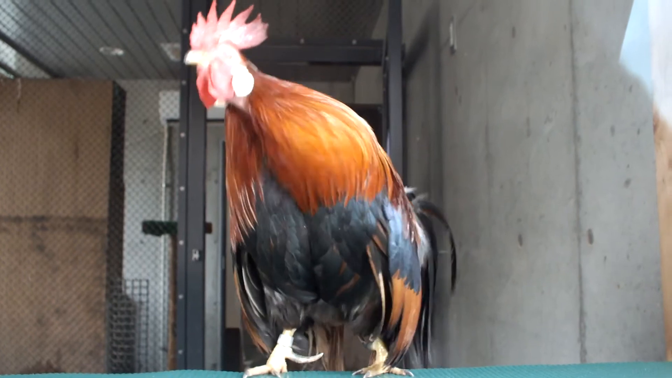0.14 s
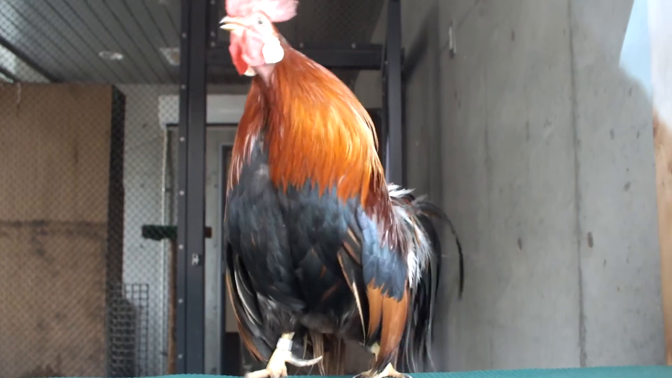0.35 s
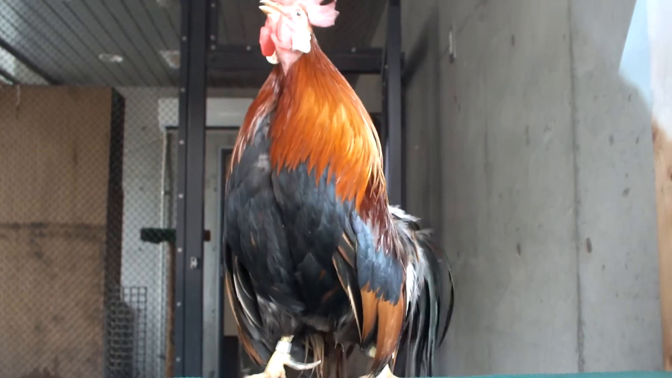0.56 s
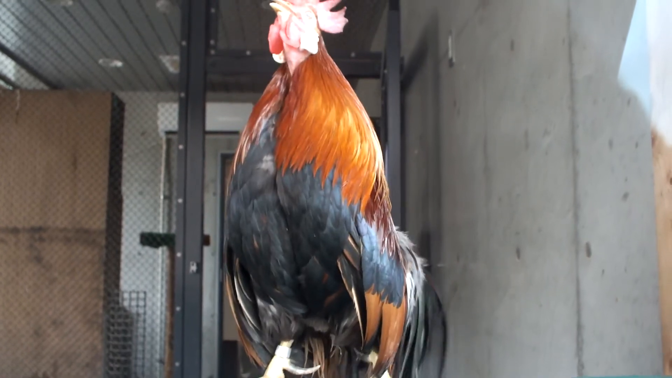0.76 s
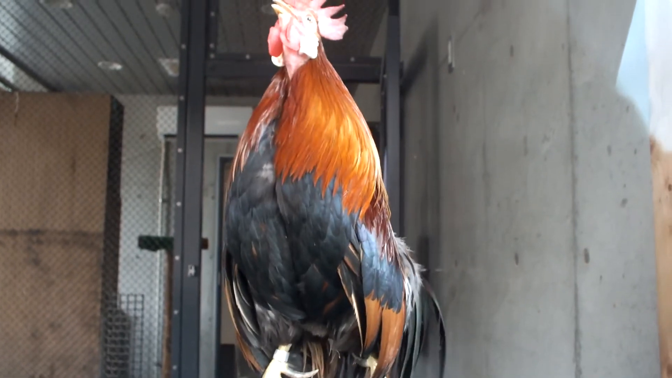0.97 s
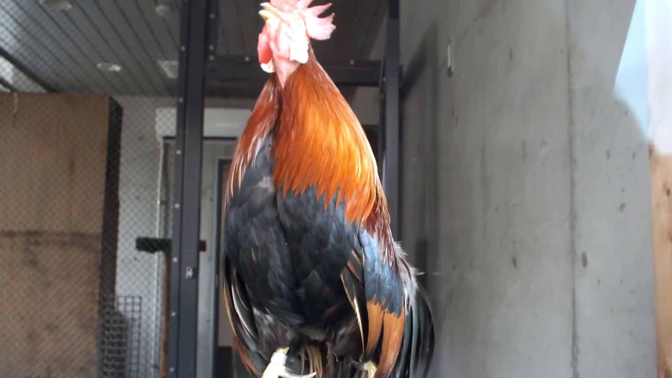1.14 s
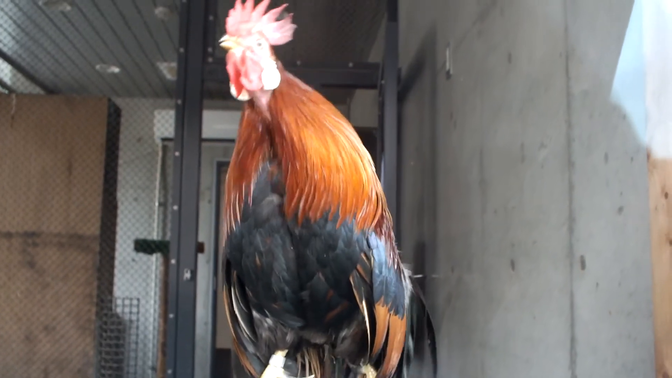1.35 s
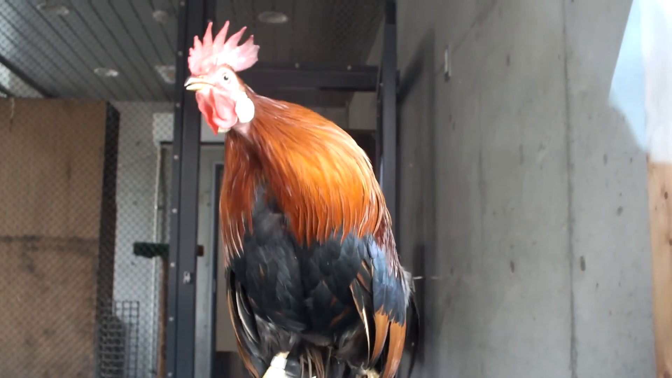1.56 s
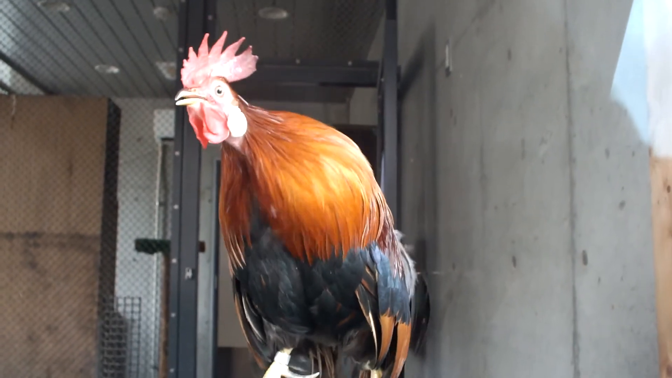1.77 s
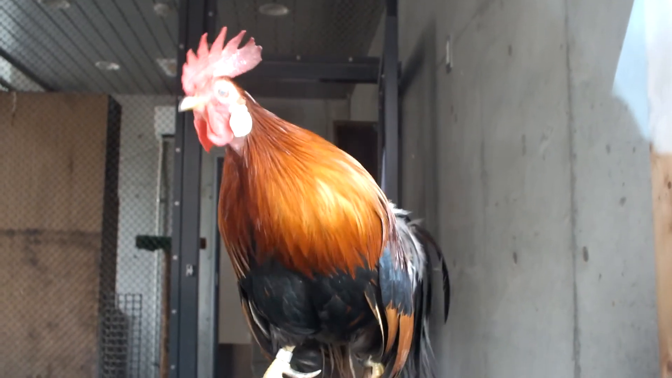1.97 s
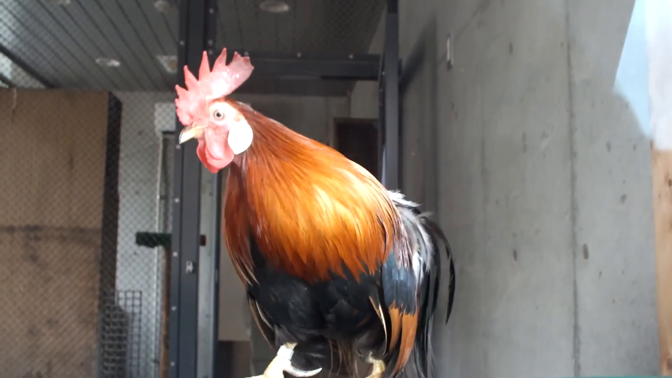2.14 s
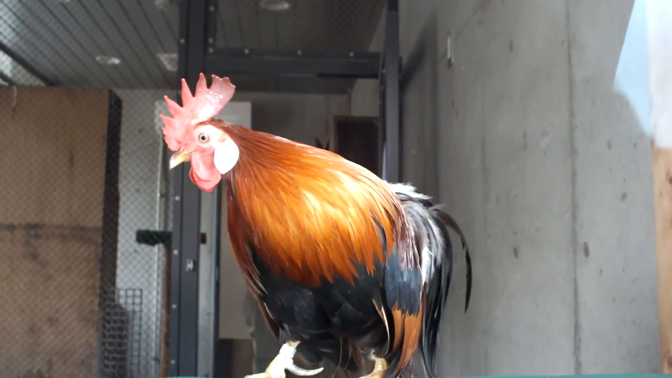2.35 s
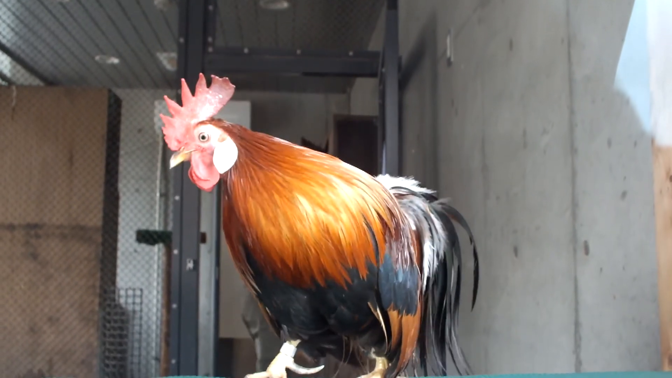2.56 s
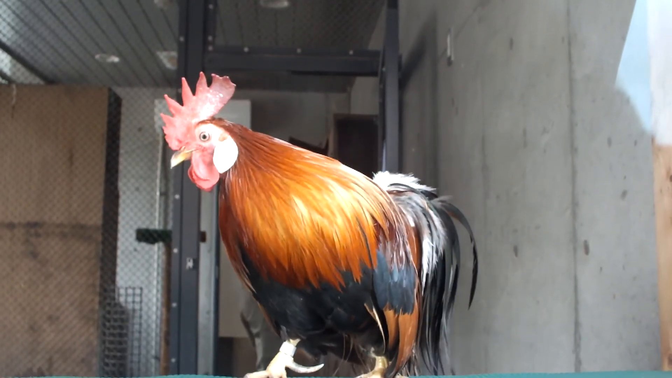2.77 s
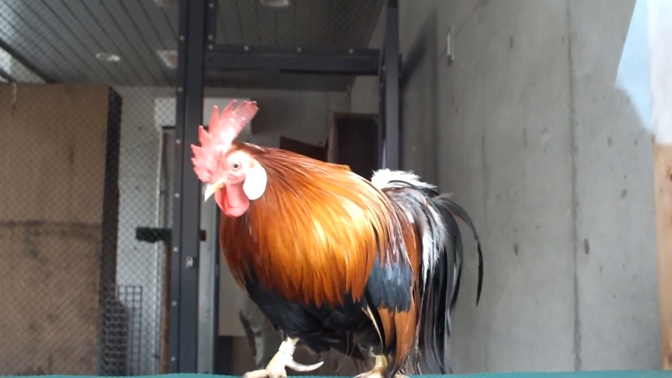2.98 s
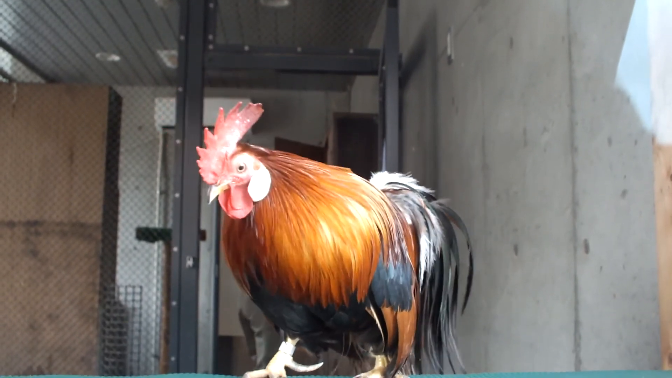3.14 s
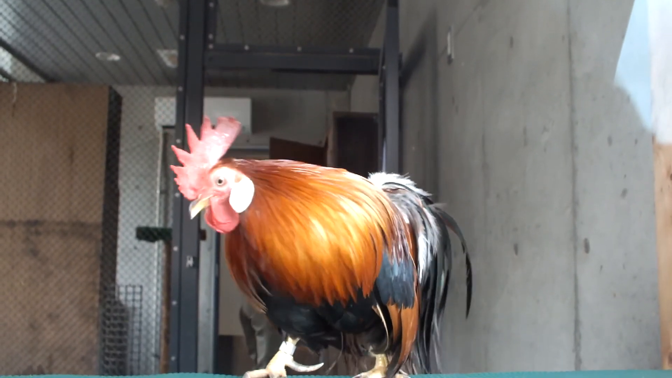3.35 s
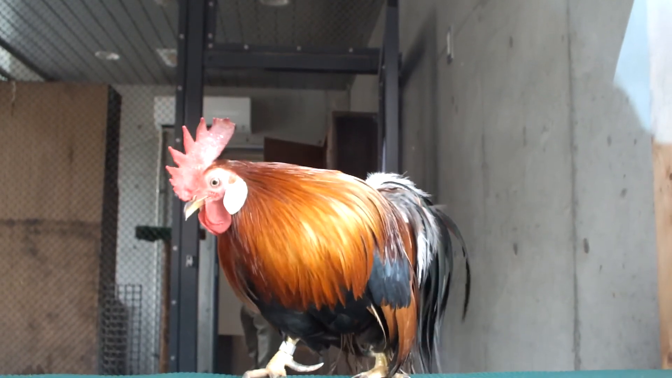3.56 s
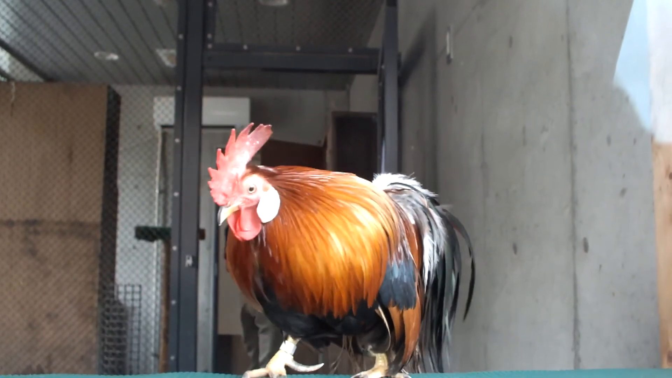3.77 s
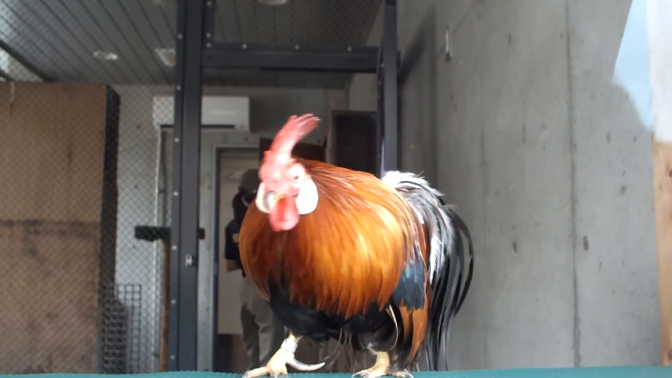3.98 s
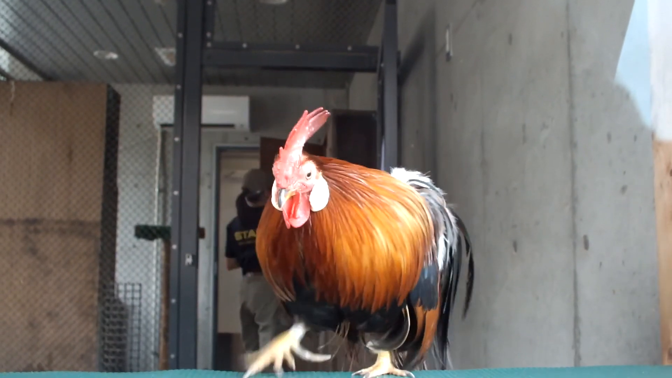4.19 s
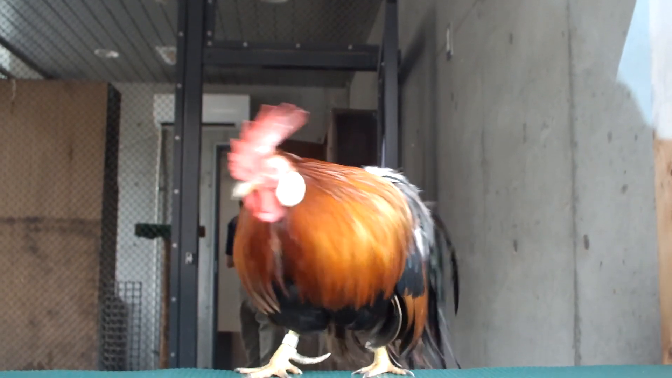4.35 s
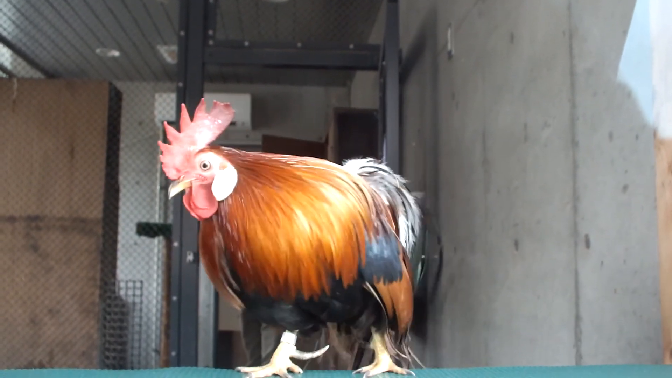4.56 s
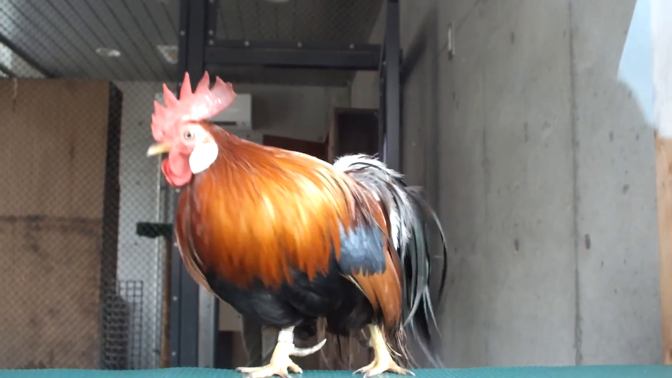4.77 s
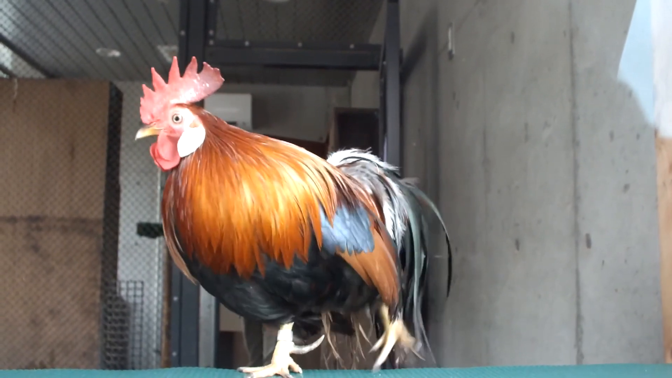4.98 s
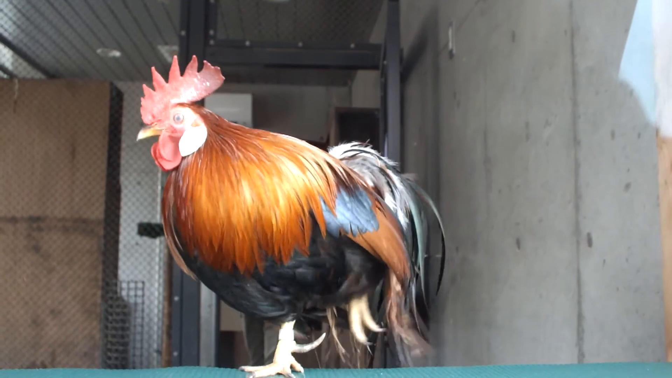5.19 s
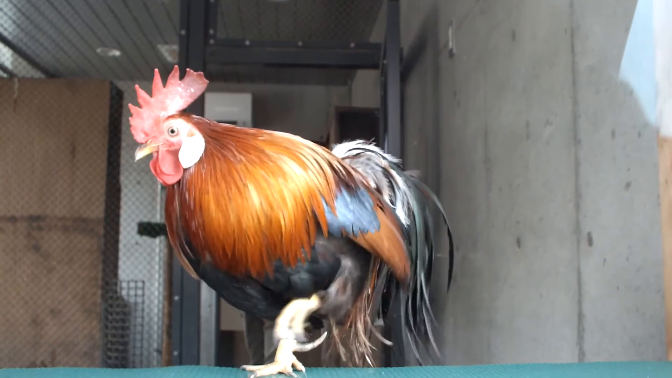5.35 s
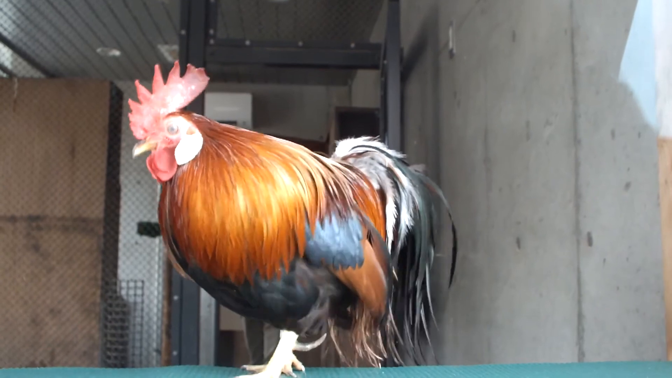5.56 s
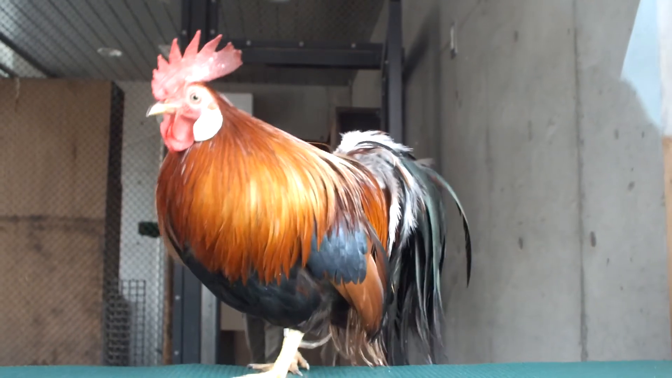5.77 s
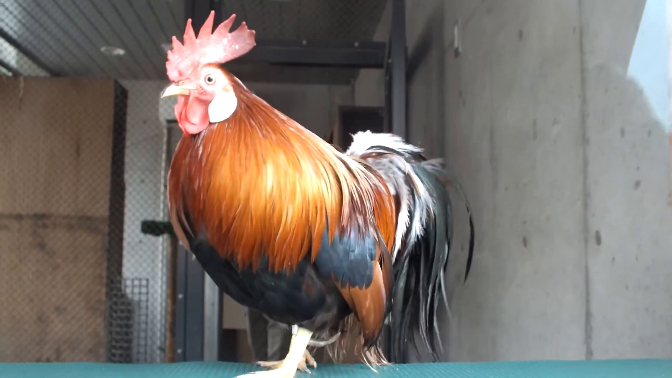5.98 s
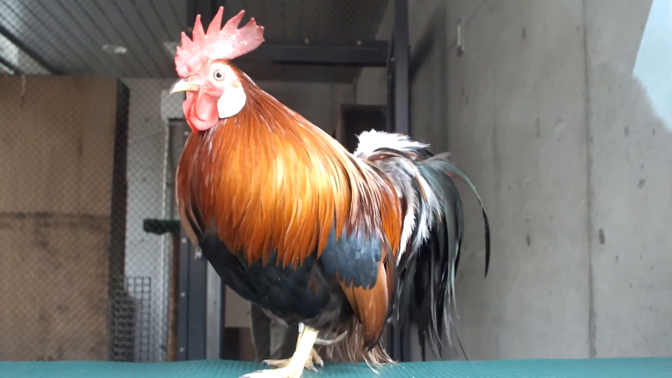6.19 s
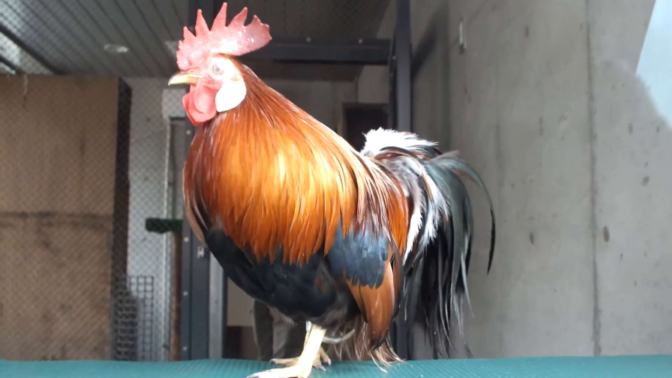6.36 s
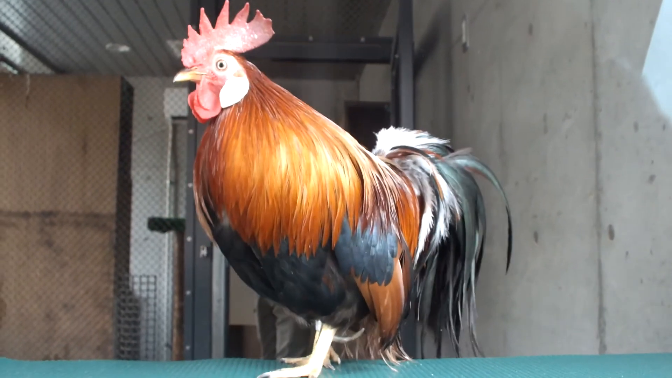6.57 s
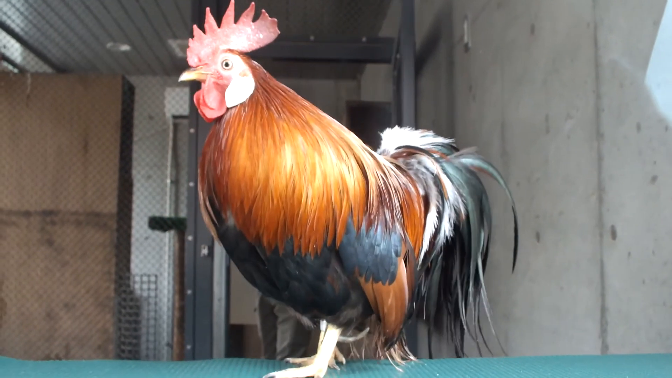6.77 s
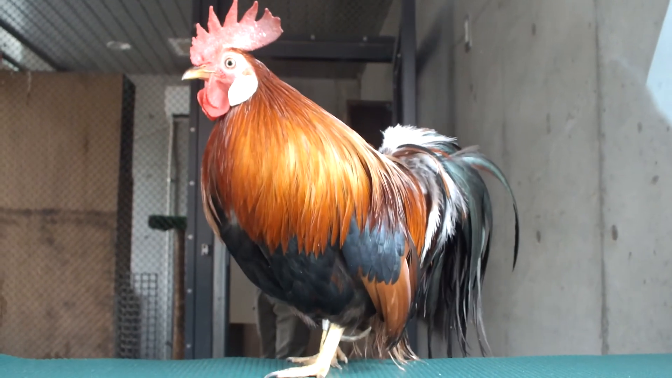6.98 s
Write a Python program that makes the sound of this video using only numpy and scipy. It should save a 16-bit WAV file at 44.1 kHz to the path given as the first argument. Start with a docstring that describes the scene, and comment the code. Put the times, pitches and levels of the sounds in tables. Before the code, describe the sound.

Close to the microphone, a rooster gives a short cluck, then a loud, hoarse, broken crow ending in a long clear note that slides down. A second bird crows more faintly behind it. Concrete walls give a brief diffuse echo. Afterwards only traffic rumble and a motor drone remain, with soft foot knocks and a far bird starting at the very end.

```python
"""Traffic rumbles and a motor drones outside, as filtered noise and a harmonic series, from start to end.
Almost at once a rooster on a table in a concrete shed crows: syrinx overtones, clear or hoarse, with rasp and pips.
A second bird joins in behind it; thin squeaks follow, and the walls answer with diffuse, decaying echoes.
Later, feet knock and scuff on the table; at the very end a far bird starts."""
import sys
import numpy as np
from scipy import signal
from scipy.fft import rfft, irfft
from scipy.io import wavfile
from scipy.ndimage import uniform_filter1d

SR = 44100
rng = np.random.default_rng(int(sys.argv[2]) if len(sys.argv) > 2 else 0)


def unload_wav(signal):
    """Save mono or channel-first audio to the path in sys.argv[1] as 16-bit WAV at rate SR, clipped to [-1, 1]."""
    wavfile.write(
        sys.argv[1],
        SR,
        np.round(np.clip(np.atleast_2d(signal).T, -1, 1) * 32767).astype(np.int16),
    )


N = 310023


def from_db(db):
    """Logarithmic level: 20 dB is a factor of ten in amplitude."""
    return 10 ** (np.asarray(db) / 20)


def rms_one(x):
    """Normalisation: scale to unit effective value."""
    return x / np.sqrt(np.mean(x ** 2) + 1e-20)


def in_time(rows):
    """Linear interpolation: the columns of a t/s table at every sample."""
    s, *columns = np.transpose(rows)
    return [np.interp(np.arange(N) / SR, s, c) for c in columns]


def at_hz(points, hz):
    """Logarithmic pitch axis: read a spectrum by equal frequency ratios."""
    log_table_hz = np.log(np.array(points)[:, 0])
    return np.interp(np.log(np.maximum(hz, 1)), log_table_hz, np.array(points)[:, 1])


def drift(rate_hz, size=N):
    """Random fluctuation: noise through a two-pole low-pass, unit rms."""
    settle = SR // 4
    r = np.exp(-2 * np.pi * rate_hz / SR)
    noise = rng.standard_normal(size + settle)
    return rms_one(signal.lfilter([1], [1, -2 * r, r * r], noise)[settle:])


def colour(x, spectrum):
    """Linear filtering: weight each frequency by the spectrum, then set rms to 1."""
    hz = np.arange(N // 2 + 1) * SR / N
    return rms_one(irfft(rfft(x) * from_db(at_hz(spectrum, hz)), N))


def bump(s, length_s):
    """Gaussian envelope: length_s is the full width at 1/e of the peak."""
    return np.exp(-(2 * (np.arange(N) / SR - s) / length_s) ** 2)


# likeness of left and right in a diffuse field: (f/Hz, correlation 0-1)
LIKENESS = [(60, 1), (180, 0.98), (500, 0.88), (1500, 0.14), (4300, 0.36), (12700, 0.27)]


def wide_noise(spectrum):
    """Partial coherence: mid and side noise mixed so that left-right likeness depends on frequency."""
    hz = np.arange(N // 2 + 1) * SR / N
    alike = np.clip(at_hz(LIKENESS, hz), 0, 1)
    mid, side = rfft(rng.standard_normal((2, N)))
    side = side * np.sqrt((1 - alike) / (1 + alike))
    pair = np.sqrt(1 + alike) * np.array([mid + side, mid - side])
    return colour(irfft(pair, N), spectrum)


DEEP_DB, FIRING_HZ = -45.5, 59.85   # mean level of the deepest rumble; fundamental of the motor
# background as heard, sinking under the crow: (t/s, rumble level/dB, motor level/dB, wash level/dB)
STREET = [(0.0, -41, -47, -43), (.3, -40, -43.5, -43), (0.42, -49.5, -53.5, -52.5), (.9, -45.5, -50.5, -46),
          (1.4, -41, -51.5, -44.5), (2.4, -40.5, -57, -44), (3.0, -39, -51, -39.5),
          (3.3, -39.5, -40.5, -41), (3.7, -38, -43.5, -42), (4.2, -36.5, -52.5, -41),
          (5.1, -38.5, -43, -41.5), (5.4, -39.5, -42.5, -42), (5.9, -39, -40.5, -41), (6.2, -38, -52, -42),
          (6.5, -39.5, -38, -41.5), (7.03, -39.5, -40.5, -41)]
# harmonics of the motor: (multiple of the fundamental, relative level/dB)
MOTOR = [(2, -6), (3, 0), (4, -13.5), (5, -4.5), (6, -6), (7, -17)]
# spectra of the deepest rumble, the rumble and the far wash: (f/Hz, relative level/dB)
DEEP = [(11, -32.5), (18, -11.5), (60, 2), (80, 7.5), (98, -5.5), (140, -33.5), (240, -120)]
RUMBLE = [(59, -22), (100, -6.5), (124, 2), (150, -1), (178, 0), (205, -2), (298, -4), (328, -4.5),
          (526, -9.5), (700, -17.5), (910, -37.5), (1540, -120)]
AIR = [(240, -20.5), (400, -19), (602, -1.5), (907, -4.5), (1180, -5), (1800, -10), (3480, -11),
       (4590, -13), (6820, -18.5), (8120, -26), (13200, -38)]


def street():
    """Superposition of fluctuating noise bands and a harmonic motor drone of wavering frequency."""
    rumble_db, motor_db, wash_db = in_time(STREET)
    deep = from_db(DEEP_DB + 2.0 * drift(2.2)) * wide_noise(DEEP)
    rumble = from_db(rumble_db + 1.0 * drift(22.0)) * wide_noise(RUMBLE)
    phase = 2 * np.pi * np.cumsum(FIRING_HZ + 0.446 * drift(3.58)) / SR
    motor = sum(from_db(motor_db + db + 2.1 * drift(1.6)) * np.sin(k * phase + k * k) for k, db in MOTOR)
    return deep + rumble + motor + from_db(wash_db) * wide_noise(AIR)


# flapping rate of the slack membrane: (t/s, f/Hz)
THROB = [(.5, 97), (.7, 88), (.85, 90), (1.0, 99), (1.2, 107), (1.45, 120), (1.85, 122), (2.0, 135),
         (3.0, 120), (6.9, 100)]


def throb():
    """Integrated frequency: phase of the slack membrane's slow, slightly uneven flapping."""
    return 2 * np.pi * np.cumsum(in_time(THROB)[0] + 4.0 * drift(10)) / SR


def span(rows, rise_s=.008):
    """Onset and decay: samples of a syllable, with a quick rise and a fall slower for longer notes."""
    a, b = round(rows[0][0] * SR), min(round(rows[-1][0] * SR), N)
    k = np.arange(b - a)
    rise = k / (rise_s * SR)
    fall = k[::-1] / (len(k) / 20) + (b == N)   # no fall where the sound ends in mid-syllable
    return slice(a, b), np.clip(np.minimum(rise, fall), 0, 1)


WAVER_DB, CLEAR_WAVER = 3.5, .4   # unsteadiness of each overtone; its share in a clear voice
SMOOTHED_SHARE = 0.16   # share of the smoothed level in all overtones but the 2nd
GRAIN, GRAIN_HZ = .4, 80   # hoarseness chops each overtone into grains
# low overtones and half lines: multiples of the pitch
MULTIPLES = (1, 2, 3, 4, 5, 2.5, 4.5)
# response of the windpipe to the low overtones: (f/Hz, level/dB)
WINDPIPE = [(600, -16.5), (900, -11.5), (1130, -12), (1560, -13), (1860, -4), (2300, -1), (2600, -5),
            (2800, -15.5), (3150, -19.5), (3600, -30.5), (4600, -19.5), (5600, -69.5)]
# lifts of the lowest, third and fourth overtones over their usual balance: (t/s, level/dB)
LOWEST = [(.05, -1.5), (.38, 6), (0.451, -3), (.6, 3), (.74, -2), (.95, 9), (1.45, -4), (1.5, 7.5),
          (1.75, -4), (2.08, -0.5), (2.14, -10), (2.3, 2), (2.44, -2.5), (2.62, 9), (2.72, 4), (3.0, 0),
          (3.15, 1), (6.95, -7), (7.03, 7)]
THIRD = [(.05, 7), (1.6, 9), (2.0, 7), (2.14, -2), (2.281, -5), (2.5, -0.5), (2.7, 5.5), (2.83, 10),
         (2.9, 11.5), (3.0, 10), (3.1, 2.5), (3.2, 0), (6.9, 2), (6.96, -9)]
FOURTH = [(.05, 7.5), (.6, -2.5), (1.0, 6), (1.5, 3), (1.9, -3.5), (2.15, 1.5), (2.5, -3.5), (2.9, -3),
          (3.0, 3), (3.1, 5.5), (3.17, -9), (6.9, 7)]


def low_overtones(part, pitch, phase, tone_db, balance, share, scatter, depth, flap, shake_db=8.0):
    """Source and filter: phase-modulated overtones of the syrinx, weighted by the windpipe."""
    size = len(pitch)
    lifts = {k: in_time(curve)[0][part] for k, curve in zip((1, 3, 4), (LOWEST, THIRD, FOURTH))}
    smoothed_db = uniform_filter1d(tone_db, size=9000, mode="nearest")
    blended_db = tone_db + SMOOTHED_SHARE * (smoothed_db - tone_db)
    out = 0
    for k, db in zip(MULTIPLES, balance):
        shaken_db = scatter * shake_db * drift(24, size)
        shaken_db = shaken_db + WAVER_DB * (CLEAR_WAVER + share / 4) * drift(24.0, size)
        level_db = tone_db if k == 2 else blended_db
        gain = from_db(level_db + db + at_hz(WINDPIPE, k * pitch) + shaken_db + lifts.get(k, 0))
        if k % 1:
            gain = gain * np.sqrt(share)   # half lines need hoarseness
        gain = gain * (1 + GRAIN * share * drift(GRAIN_HZ, size))
        out = out + gain * np.sin(k * phase + depth * np.sin(flap + k))
    return out


SHRILL_FOLLOWS, SHRILL_SPREAD_HZ = 0.13, 220   # share of the tone's swing; smear by hoarseness
# shrill overtones over their row: (t/s, level of all/dB, further level of the 6th and 7th/dB)
BRIGHT = [(.05, 3, 1), (.35, 6, -21), (.45, -3.5, -0.5), (.75, -8, 5), (1.0, -3, 5), (1.3, 0.5, 5.5),
          (2.05, -7, 4), (2.15, -6, -11), (2.3, -3, -9), (2.46, -2.5, -6), (2.53, -0.5, 9), (2.7, 0, 9.5),
          (2.85, -0.5, 6), (3.0, -4.5, -9), (3.15, -20, 1), (6.9, -12, 0), (6.96, -3, -2)]


def shrill_overtones(part, phase, tone_db, shrill, share):
    """Amplitude modulation by noise: hoarseness smears the upper overtones into bands."""
    size = len(phase)
    all_db, edge_db = [c[part] for c in in_time(BRIGHT)]
    all_db = all_db + SHRILL_FOLLOWS * (tone_db - np.median(tone_db))
    out = 0
    for k, db in enumerate(shrill):
        gain = from_db(db + all_db + edge_db * (k < 2) + 2.5 * drift(8.0, size))
        smear = 1 - share + share * drift(SHRILL_SPREAD_HZ, size)
        out = out + gain * smear * np.sin((6 + k) * phase + k * k)
    return out


ROUGH_DB, ROUGH_HZ, HALF_LINES_DB = 1, 30, -7   # clinging rasp: level, fluctuation rate, half lines' level
RATTLE = .75   # how far each flap of the membrane shuts off the rasp, 0-1
# throat resonances that colour the rasp: (f/Hz, relative level/dB)
THROAT = [(600, -41), (780, -54), (860, -10.5), (1080, -8.5), (1350, -10.5), (1700, 1.5), (2200, 4.5),
          (3000, -4), (3400, -11), (3750, -20.5), (4150, -9.5), (4550, -19), (4750, -47.5), (5300, -59),
          (5700, -41), (6400, -49.5), (6900, -28.5), (7900, -36.5), (8500, -54), (9300, -71),
          (10200, -40.5), (11200, -42), (13000, -46)]


def clinging_rasp(pitch, phase, rasp_db, gape, flap):
    """Narrow-band noise: fluctuating lines at the overtones and half way between, shaped by the throat."""
    stretch, treble_db = gape
    out = 0
    for k in np.arange(2, 24) / 2:
        above = np.clip(k * pitch / 500 - 6.5, 0, 1)   # 0 below 3.25 kHz, 1 above 3.75 kHz
        line_db = at_hz(THROAT, k * pitch / stretch) + treble_db * above + HALF_LINES_DB * (k % 1 > 0)
        out = out + from_db(line_db) * (.6 + .8 * drift(ROUGH_HZ, len(pitch))) * np.sin(k * phase + k * k)
    return from_db(rasp_db + ROUGH_DB) * out * (1 + RATTLE * np.cos(flap)) / 2


CLEAR_SCATTER = .06   # pitch scatter of a clear voice, 0-1
# one table a syllable, five of the crow, the second bird, the far bird:
# (t/s, f/Hz, tone level/dB, rasp level/dB)
SYLLABLES = [
    [(.058, 854, -37, -31), (.07, 868, -22, -32), (.09, 869, -14.5, -30.5), (.12, 849, -22, -25.5),
     (.15, 841, -24, -29.5), (.18, 852, -50, -58)],
    [(.322, 1109, -51, -31), (.36, 1131, -22, -21.5), (.41, 1125, -14, -41), (.46, 1122, -21.5, -48),
     (.485, 1133, -28, -24.5), (.55, 1139, -19.5, -23.5), (.595, 1131, -14.5, -29.5),
     (.655, 1136, -22.5, -43), (.665, 1121, -17, -26), (.69, 1131, -27, -27.5), (.72, 1115, -13, -24.5),
     (.74, 1131, -20.5, -25.5), (.78, 1134, -23.5, -25), (.83, 1079, -20.5, -25.5), (1.0, 1065, -36, -29.5),
     (1.1, 1047, -77, -38), (1.17, 1080, -62, -52), (1.33, 1084, -61, -38)],
    [(1.39, 930, -43, -45), (1.42, 970, -27, -27), (1.468, 1007, -17, -25.5), (1.52, 1007, -29.5, -27.5),
     (1.58, 963, -46, -32.5), (1.61, 973, -31, -23)],
    [(1.605, 1039, -26.5, -22.5), (1.65, 1127, -25, -27.5), (1.72, 1106, -21, -24.5), (1.8, 1093, -25, -26),
     (1.865, 1068, -20.5, -25.5), (1.93, 1050, -27, -24), (2.0, 1098, -24, -27), (2.032, 1098, -18, -27),
     (2.06, 1070, -38.5, -32.5), (2.09, 1091, -14.5, -38), (2.11, 1095, -39, -55)],
    [(2.08, 873, -24.5, -54), (2.136, 882.6, -18, -61), (2.2, 910.4, -20, -61), (2.264, 915, -17, -64),
     (2.315, 938, -25.5, -57), (2.345, 925, -13, -61), (2.385, 940, -28, -65), (2.41, 933, -24, -52),
     (2.435, 933, -9.5, -57), (2.46, 928, -12.5, -65), (2.495, 927, -20, -69), (2.525, 932, -15, -69),
     (2.56, 928, -31.5, -60), (2.6, 917, -22, -54), (2.64, 927.4, -19.5, -59), (2.7, 912.6, -17.5, -65),
     (2.76, 902, -21.5, -60), (2.828, 872.3, -20.5, -49), (2.906, 854, -23.5, -45),
     (2.97, 811.4, -22.5, -49), (3.028, 769, -20, -45), (3.08, 726, -25.5, -37), (3.14, 671.7, -26, -34.5),
     (3.19, 630, -34, -30.5), (3.28, 591.6, -44, -43)],
    [(.76, 860, -34, -41.5), (.96, 864.6, -26.5, -27.5), (1.06, 849.5, -20.5, -26),
     (1.18, 812.7, -28, -35.5), (1.42, 845.7, -36, -43.5), (1.52, 855, -27.5, -33),
     (1.66, 822, -27.5, -35.5), (1.76, 825, -46, -55)],
    [(6.885, 912, -36, -43), (6.905, 914, -27, -32), (6.93, 916, -26.5, -36), (6.954, 930, -17, -38),
     (6.97, 936, -29.5, -29), (6.985, 950, -17, -27.5), (7.0, 923, -53, -31), (7.03, 932, -19.5, -37)],
]
# overtone balance, a row a syllable: (level/dB of as many MULTIPLES as it has)
BALANCE = [(4, 3, -10, -0.5, -20, -19, -5), (-2, 1.5, -2.5, -3, -27, 0.5, -40),
           (2, 2.5, -10, 9, 8.5, -26, -20), (10.5, -5.5, 8.5, 6, -17, -17, 13), (-9, 0, -6.5, 5.5, -6),
           (-12, 8.5, -11), (-1.5, -0.5, 7.5, -2, 2.5)]
# overtones above the fifth, a row a syllable: (level/dB of multiples 6 to 13)
SHRILL = [(-70, -70, -56, -52, -71, -69, -68, -68), (-59, -56.5, -93, -65, -62.5, -75.5, -91, -89),
          (-74, -64, -56, -60, -61, -78, -71, -75), (-64, -56, -62, -56, -73, -77.5, -85, -93),
          (-88, -62.5, -53.5, -49.5, -58.5, -68.5, -70, -66.5),
          (-84, -71, -69, -68, -60.5, -78.5, -71, -92), (-70, -64, -70, -74, -56, -78, -69, -85)]
# what full hoarseness adds, a row a syllable: (pitch scatter 0-1, throb depth of the slack membrane 0-1)
HOARSE = [(.13, .4), (.11, .8), (.14, .45), (.16, .6), (.4, .4), (.14, .8), (.2, .5)]
# throat of each syllable's rasp: (factor on its resonances, level above about 3.5 kHz/dB)
GAPE = [(0.99, -4), (0.987, 2), (1.106, 0.5), (1.121, 3), (0.91, -27), (.96, 0.5), (1.1, -12)]


def syllable(rows, balance, shrill, hoarse, gape, flap, scatter_hz=63.6):
    """Nonlinear phonation: more rasp brings pitch scatter, shaking, and throb with side and half lines."""
    part, ends = span(rows)
    size, flap = len(ends), flap[part]
    pitch, tone_db, rasp_db = [c[part] for c in in_time(rows)]
    share = np.minimum(2 / (1 + from_db(2 * (tone_db - rasp_db))), 1)   # hoarseness, 0-1
    scatter, depth = CLEAR_SCATTER + share * hoarse[0], share * hoarse[1]
    pitch = uniform_filter1d(pitch, size=1500, mode="nearest")   # muscles retune slowly
    jitter = drift(92.4, size) + drift(8.5, size) / 5
    phase = 2 * np.pi * np.cumsum(pitch + scatter * scatter_hz * jitter) / SR
    voice = low_overtones(part, pitch, phase, tone_db, balance, share, scatter, depth, flap)
    voice = voice + clinging_rasp(pitch, phase, rasp_db, gape, flap)
    voice = voice + shrill_overtones(part, phase, tone_db, shrill, share)
    out = np.zeros(N)
    out[part] = np.sqrt(2) * ends * voice * (1 + depth / 2 * np.cos(flap))
    return out


def breath():
    """Addition of powers: strength of the rasp of all syllables together."""
    power = np.zeros(N)
    for rows in SYLLABLES:
        part, ends = span(rows)
        power[part] += (ends * from_db(in_time(rows)[2][part])) ** 2
    return np.sqrt(power)


LOOSE_RASP_DB = -7   # rasp that does not follow the pitch


def rasp(flap, puff_share=3.0):
    """Pulsed turbulence: an uneven puff for each flap, slowly changing shape, plus air, through the throat."""
    flaps = np.diff(np.floor(flap / (2 * np.pi)), prepend=0) * from_db(2.0 * drift(54))
    shapes = rng.standard_normal((2, 300)) * np.hanning(600)[300:] ** 2
    puffs = sum(signal.fftconvolve(flaps * drift(1.68), shape)[:N] for shape in shapes)
    air = rng.standard_normal(N) * from_db(2.0 * np.cos(flap) + 2.0 * drift(60))
    # loudness follows the breath alone
    evened = puffs / np.sqrt(uniform_filter1d(puffs ** 2, size=2000) + 1e-9)
    coloured = colour(puff_share * evened + rms_one(air), THROAT)
    return from_db(LOOSE_RASP_DB) * breath() * (1 + RATTLE * np.cos(flap)) * coloured


# short pips as the voice catches: (centre t/s, f/Hz, peak level/dB, 1/e width t/s)
PIPS = [(0.063, 1435, -24, 0.01), (0.065, 2850, -10, 0.0056), (0.07, 2146, -14, 0.0034),
        (0.322, 2145, -20, 0.0063), (0.325, 2150, -4.5, 0.0021), (0.329, 1770, -11, 0.0044),
        (0.351, 3090, -21, 0.015), (0.474, 1726, -28, 0.0066), (0.478, 2110, -14, 0.0048),
        (0.503, 2080, -18, 0.0076), (0.57, 2120, -13, 0.0052), (0.664, 2120, -15.5, 0.0074),
        (0.76, 2050, -12, .006), (0.983, 2043, -20.5, 0.0065), (0.66, 1800, -32, 0.0056),
        (0.718, 1910, -19, 0.0056), (0.742, 1680, -32, 0.0056), (1.375, 2145, -6.5, 0.0021),
        (1.43, 2240, -12.5, 0.0091)]


def pips():
    """Tone bursts: sinusoids under Gaussian envelopes."""
    t = np.arange(N) / SR
    return sum(from_db(db) * bump(s, length) * np.sin(2 * np.pi * hz * t) for s, hz, db, length in PIPS)


# reverberation time, to a fall of 60 dB: (f/Hz, t/s)
SHED_T60 = [(300, 0.33), (1500, 0.59), (3000, 0.52), (8000, 0.38)]
# echoes common to both ports: (f/Hz, gain against each port's own)
SHED_SHARED = [(300, 2.3), (1200, 1.8), (2300, 1.04), (4500, 0.44), (9000, .1)]


def shed(x):
    """Diffuse reverberation: echoes decay exponentially band by band, partly shared by the ports."""
    t, tail = np.arange(SR) / SR, 0
    edges = 200 * 2.0 ** np.arange(7)   # octave bands, Hz
    for low, high in zip(edges, edges[1:]):
        centre = np.sqrt(low * high)
        octave = signal.butter(2, [low, high], "band", fs=SR, output="sos")
        band = signal.sosfilt(octave, rng.standard_normal((3, SR)))
        shared = at_hz(SHED_SHARED, centre)
        mixed = (band[1:] + shared * band[0]) / np.hypot(1, shared)
        tail = tail + mixed * from_db(-60 * t / at_hz(SHED_T60, centre))
    tail = tail * np.clip(t / 0.0029, 0, 1)   # builds up after the direct sound
    tail = tail / np.sqrt(np.sum(tail ** 2, axis=1, keepdims=True))
    return signal.fftconvolve(x[None], tail, axes=1)[:, :N]


SQUEAK_ATTACK_S, SQUEAK_FADE_DB = 0.029, 11.5
SQUEAK_SAG_HZ_PER_S, SQUEAK_WAVER_HZ = 240, 5
# thin single-tone squeaks between syllables: (t/s, f/Hz, peak level/dB, fade t/s)
SQUEAKS = [(1.095, 2408, -22, 0.093), (1.201, 2470, -30.5, 0.047), (1.238, 2940, -21.5, 0.022),
           (1.298, 2865, -16, 0.043), (1.365, 2800, -24, 0.05), (1.642, 2410, -19.5, 0.064)]


def squeak(row):
    """Frequency modulation: a nearly pure tone wavers and sags while its level rises, then fades."""
    s, hz, db, length = row
    t = np.arange(round((SQUEAK_ATTACK_S + length) * SR)) / SR
    quiet_db = db - SQUEAK_FADE_DB
    level_db = np.interp(t, [0, SQUEAK_ATTACK_S, t[-1]], [quiet_db, db, quiet_db])
    ends = np.clip(np.minimum(t, t[::-1]) / .005, 0, 1)
    pitch = hz - SQUEAK_SAG_HZ_PER_S * t + SQUEAK_WAVER_HZ * drift(80, len(t))
    tone = np.sin(2 * np.pi * np.cumsum(pitch) / SR)
    out, a = np.zeros(N), round(s * SR)
    out[a:a + len(t)] = np.sqrt(2) * ends * from_db(level_db) * tone
    return out


# feet shifting on the table: (centre t/s, thump level/dB, scuff level/dB, 1/e width t/s)
STEPS = [(4.082, -34.5, -48, 0.089), (4.164, -46, -43, 0.063), (4.539, -34, -49, 0.044),
         (5.88, -54, -46, 0.03)]


def steps():
    """Impact and friction: resonant noise for the table top's dull knock, wider noise for scuffing claws."""
    # spectra: (f/Hz, relative level/dB)
    knock = colour(rng.standard_normal(N), [(120, -38), (200, -1.5), (270, 12.5), (400, -30), (800, -44)])
    scuff = colour(rng.standard_normal(N),
                   [(300, -20), (700, 1.5), (2500, -5.0), (5000, -16.0), (9000, -70)])
    return sum(bump(s, length) * (from_db(knock_db) * knock + from_db(scuff_db) * scuff)
               for s, knock_db, scuff_db, length in STEPS)


# difference in colour of the ports: (f/Hz, left minus right level/dB)
PORTS = [(500, 0), (2000, 0), (4000, -1.2), (8000, -3.5), (12000, -.5)]


def ports(pair, lead):
    """Interaural difference: the two ports differ in level and phase at each frequency."""
    pair = np.pad(pair, [(0, 0), (2048, 2048)], "reflect")
    size = pair.shape[1]
    hz = np.fft.rfftfreq(size, 1 / SR)
    left = from_db(at_hz(PORTS, hz) / 2) * np.exp(.5j * at_hz(lead, hz))
    return irfft(rfft(pair) * [left, 1 / left], size)[:, 2048:-2048]


SHED_DB = -4   # walls against the direct sound
# level of the sound sent to the walls: (t/s, level/dB)
TO_WALLS = [(.05, -2), (.7, -4), (.9, 0), (1.2, 0), (1.26, -6), (1.36, -6), (1.45, -1), (2.15, 0),
            (2.3, -7), (2.62, -7), (2.78, 1), (3.15, 2), (3.4, 0)]
# phase by which the left port leads, for the shed and for the street: (f/Hz, phase/rad)
NEAR_LEAD = [(100, .02), (500, .12), (1000, .28), (2000, .55), (4000, .6), (9000, .8), (12500, 2.2)]
STREET_LEAD = [(30, .02), (125, .07), (500, .28), (1000, .57), (2000, 1.1), (4000, 2.3), (8000, 4.5),
               (13000, 7.4)]


def scene():
    """Superposition: the street, the direct birds and feet, and the answer of the walls."""
    outside = ports(street(), STREET_LEAD)
    flap = throb()
    birds = sum(syllable(*voice, flap) for voice in zip(SYLLABLES, BALANCE, SHRILL, HOARSE, GAPE))
    direct = birds + rasp(flap) + pips() + sum(map(squeak, SQUEAKS)) + steps()
    echoes = from_db(SHED_DB) * shed(direct * from_db(in_time(TO_WALLS)[0]))
    return outside + ports(np.array([direct, direct]) + echoes, NEAR_LEAD)


CUTOFF_HZ = 13150


def record(dry):
    """Band limitation: a steep elliptic low-pass cuts the top; the last instants fade."""
    fade = np.clip(np.arange(N)[::-1] / 300 - .1, 0, 1)
    low_pass = signal.ellip(12, .5, 80, CUTOFF_HZ, fs=SR, output="sos")
    return fade * signal.sosfilt(low_pass, dry)


dry = scene()
out = record(dry)
unload_wav(out)
```